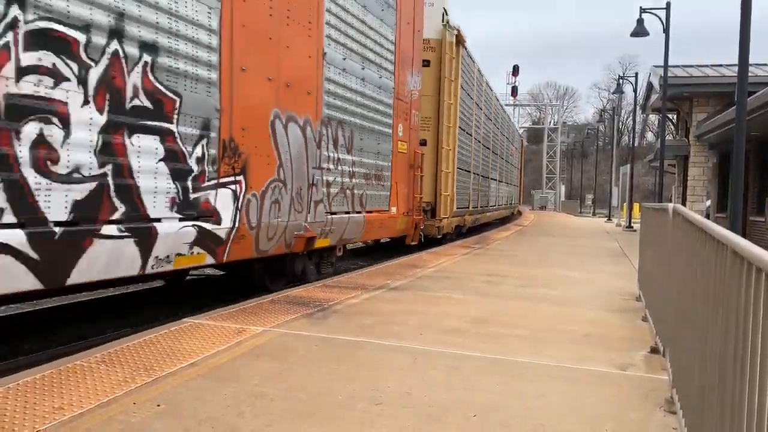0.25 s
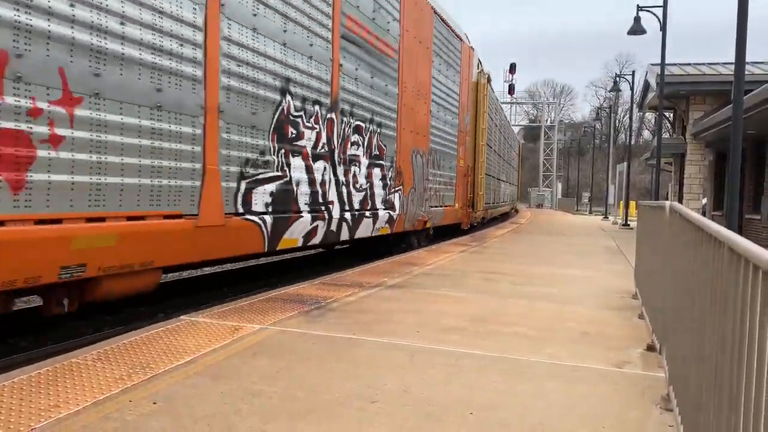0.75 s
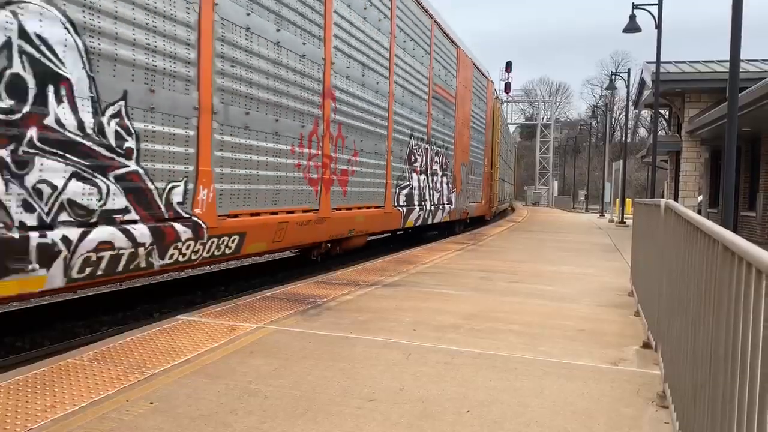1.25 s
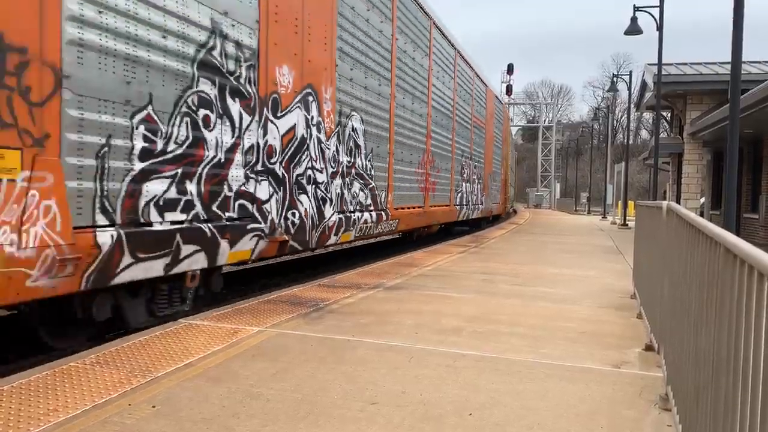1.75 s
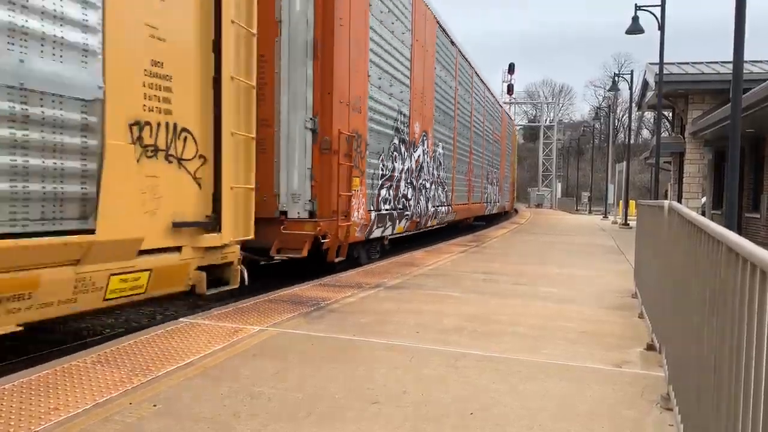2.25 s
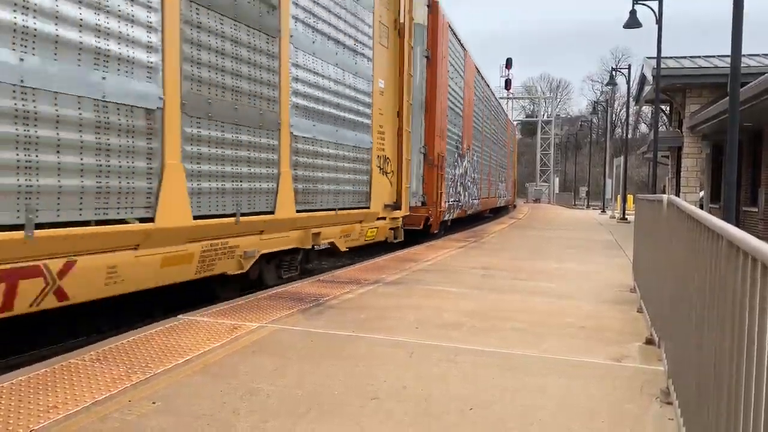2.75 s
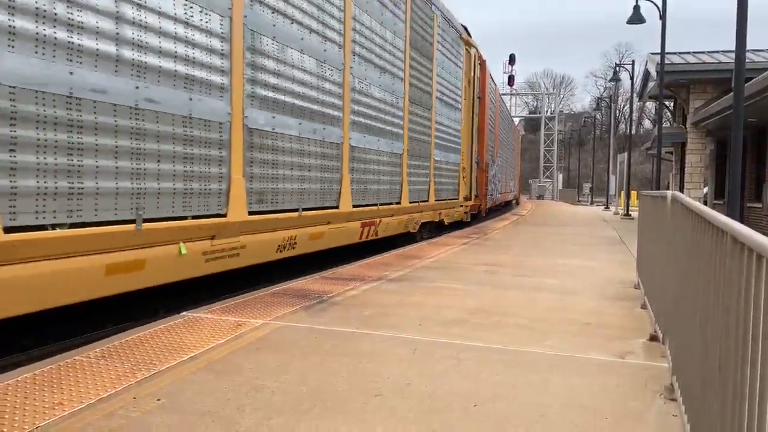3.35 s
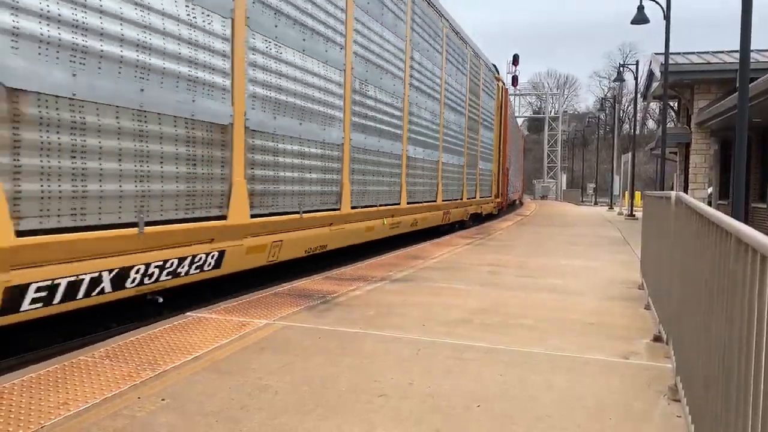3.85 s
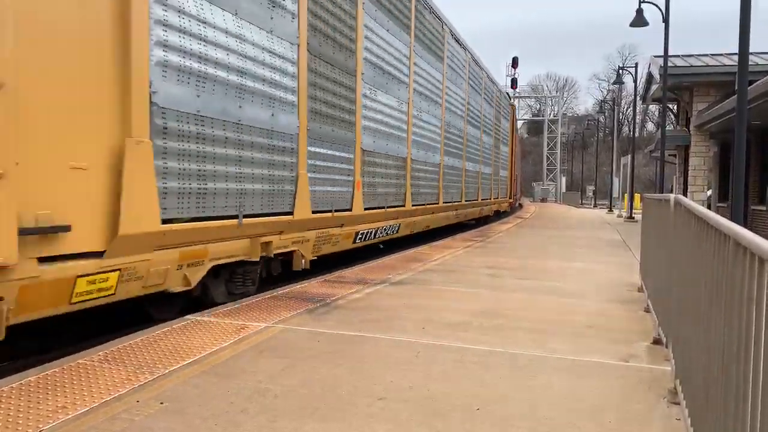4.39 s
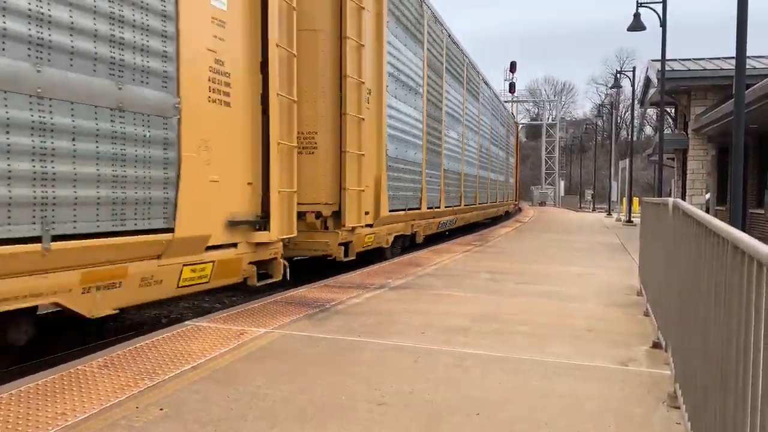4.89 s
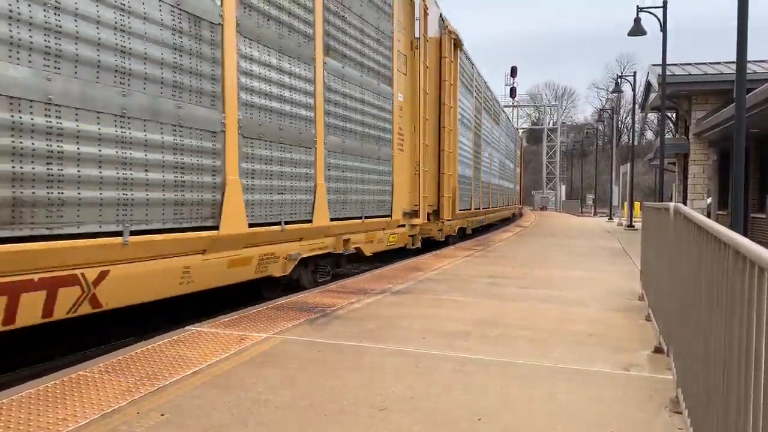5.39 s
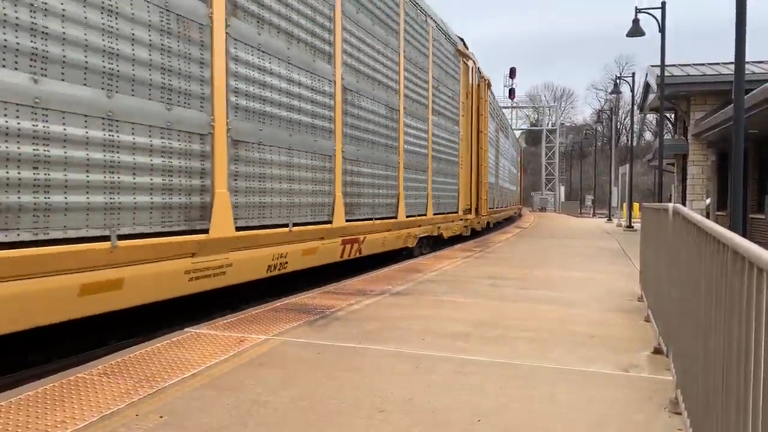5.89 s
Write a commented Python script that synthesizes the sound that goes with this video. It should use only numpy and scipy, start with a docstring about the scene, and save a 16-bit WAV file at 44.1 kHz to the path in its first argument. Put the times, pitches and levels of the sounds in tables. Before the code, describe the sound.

A few metres from stereo microphones on an open station platform, a long freight train rolls by without a break. Deep uneven rumble and hollow car-body noise carry a rougher steel roar. Every second or so wheels bang over a rail joint in quick clusters, booming and rattling. Flanges scrape and hiss, thin whistles come and go, panels drone, and near the end a wheel squeals hoarsely.

```python
"""Tall steel car carriers of a freight train roll past a station platform, a few metres from two microphones.
Rough wheels rumble through the hollow cars and roar on the rail, made from coloured noise and small impacts.
Wheels bang over a rail joint in clusters: bursts of noise die away as booms and rattles, and cars thump.
Flanges hiss as fluttering noise; wheels and panels sing as wandering tones, and a last wheel squeals."""
import sys
import numpy as np
from scipy import signal
from scipy.fft import rfft, irfft, next_fast_len
from scipy.io import wavfile
from scipy.ndimage import uniform_filter1d, map_coordinates

SR = 44100
rng = np.random.default_rng(int(sys.argv[2]) if len(sys.argv) > 2 else 0)


def log_audio(samples):
    """Write samples as a 16-bit WAV file to the path given in sys.argv[1]."""
    # one column per channel
    frames = np.atleast_2d(samples).T
    # limit to full scale, then quantise
    limited = np.clip(frames, -1, 1)
    pcm = np.round(limited * 32767).astype(np.int16)
    wavfile.write(sys.argv[1], SR, pcm)


N = 270333  # length in samples

# Tone colour of the boom in a hollow car. Each row: frequency in Hz, relative level in dB per Hz.
BOOM_SPECTRUM = [(20, -40), (45, -26), (70, -1.5), (110, 0), (160, 0), (250, -11.5), (400, -8.5),
                 (600, -18.5), (900, -28), (1500, -30), (4000, -58)]

STEEL_PATCHY_DB = 2.2  # how strongly resonances in the steel come and go


def amp(db):
    """Turn decibels into a gain."""
    return 10 ** (np.asarray(db) / 20)


def unit(x):
    """Scale to an rms (average strength) of 1."""
    return x / np.sqrt(np.mean(x ** 2) + 1e-20)


def along(points, hz):
    """Read a value between (Hz, value) points, on a logarithmic frequency axis."""
    point_hz, values = np.transpose(points)
    return np.interp(np.log(hz + 1), np.log(point_hz + 1), values)


def curves(rows):
    """Give one value per sample for each column after the time in seconds."""
    seconds, *columns = np.transpose(rows)
    return [np.interp(np.arange(N) / SR, seconds, column) for column in columns]


def wobble(rate, size=N):
    """Draw a smooth random curve through `rate` random points a second."""
    knots = rng.standard_normal(int(size * rate / SR) + 4)
    coarse = np.arange(0, size + 32, 32)  # a value every 32 samples is enough
    smooth = map_coordinates(knots, [coarse * rate / SR])
    return np.interp(np.arange(size), coarse, smooth)


def filtered(x, response):
    """Multiply the spectrum of x by a response that depends on frequency."""
    size = x.shape[-1]
    padded = next_fast_len(size + 8192)
    hz = np.fft.rfftfreq(padded, 1 / SR)
    return irfft(rfft(x, padded) * response(hz), padded)[..., :size]


def rush(spectrum, size=N):
    """Make two unrelated coloured noises, rms 1: the direct and the scattered sound."""
    noise = rng.standard_normal((2, size))
    return unit(filtered(noise, lambda hz: amp(along(spectrum, hz))))


def patchy(x, depth_db):
    """Let resonances come and go as different panels and wheels pass."""
    bins = signal.stft(x, nperseg=1024)[2]
    field = rng.standard_normal(bins.shape[1:])
    field = uniform_filter1d(field, size=4, axis=0)   # smooth over frequency
    field = uniform_filter1d(field, size=14, axis=1)  # smooth over time
    return unit(signal.istft(bins * amp(depth_db * unit(field)), nperseg=1024)[1][:, :N])


def rattle(spectrum, rate, size=N):
    """Loose steel chatters: about `rate` small uneven impacts a second at random times, rms 1."""
    strength_db = 5 * np.clip(rng.standard_normal(size), -2, 1.5)
    hits = (rng.random(size) < rate / SR) * amp(strength_db)
    t = np.arange(SR // 30) / SR
    tick = rng.standard_normal((2, len(t))) * amp(-60 * t / 0.079)  # falls 60 dB in 0.079 s
    ticks = signal.fftconvolve(hits[None], tick, axes=1)[:, :size]
    return unit(filtered(ticks, lambda hz: amp(along(spectrum, hz))))


def sing(centre_hz, width_hz, size=N, fall_hz=0, firm=0):
    """Friction drives a mode: its strength and phase wander about a firm core while its pitch sinks."""
    pitch_hz = centre_hz + fall_hz * np.linspace(.5, -.5, size)
    phase = 2 * np.pi * (rng.random() + np.cumsum(pitch_hz) / SR)
    core = (firm + wobble(2 * width_hz, size)) * np.cos(phase)
    wandering = wobble(2 * width_hz, size) * np.sin(phase)
    return unit(core + wandering)


def swell(length, hz, width_hz, fall_hz=0, slip_db=0):
    """A driven mode swells, holds and fades; narrow modes lock into a firm tone, slipping makes them flutter."""
    lock_hz, slip_rate = 22, 12  # modes narrower than this sing as firm tones; flutter points a second
    size = max(round(length * SR), SR // 20)
    flutter = amp(slip_db * wobble(slip_rate, size))
    tone = unit(sing(hz, width_hz, size, fall_hz, firm=lock_hz / width_hz) * flutter)
    return signal.windows.tukey(size, .35) * tone


def add(track, start, x):
    """Mix x into the track from a start time in seconds."""
    part = track[..., max(round(start * SR), 0):][..., :x.shape[-1]]
    part += x[..., :part.shape[-1]]


def rolling():
    """Wheel roughness shakes the hollow cars and the rail; loose panels chatter along."""
    # Tone colours of the three layers. Each row: frequency in Hz, relative level in dB per Hz.
    rumble_spectrum = [(15, -58), (25, -42), (40, -10.5), (55, -2.5), (75, -1), (100, -4.5), (140, -13),
                       (250, -10), (500, -99)]
    body_spectrum = [(60, -12), (120, 1), (200, -0.5), (300, 2), (400, -1), (520, -8), (700, -13.5),
                     (1000, -13), (1400, -29.5), (3000, -87)]
    roar_spectrum = [(400, -40), (600, 5), (850, -2), (1300, -1), (1850, -4), (2200, -5), (2600, -1),
                     (3200, -5.5), (4200, -9.5), (7000, -17), (12000, -60)]
    # How hard the passing wheels run. Each row: time in seconds, roughness in dB over the usual.
    roughness = [(0, -1), (0.8, -1.5), (1.15, 0.5), (1.6, -1), (2.3, 2.5), (2.75, -1.7), (3.4, -2),
                 (4.05, 2.5), (4.8, 0), (5.3, -2.5), (6.1, 0.4)]
    rumble_db, body_db, roar_db = -27, -24, -37.5  # levels at the usual roughness
    rumble_grows, roar_grows = 0.37, 1  # dB for each dB of roughness
    rumble_build_db, rumble_build_s = 3, 1.9  # the rumble starts this much lower; time constant of its rise
    lumps_db, body_patchy_db = 2.4, 1.7  # unevenness of the rumble; changing tone of the car bodies

    rough_db, = curves(roughness)
    build_db = -rumble_build_db * np.exp(-np.arange(N) / SR / rumble_build_s)
    rumble_level_db = rumble_db + rumble_grows * rough_db + build_db + lumps_db * wobble(16)
    rumble = amp(rumble_level_db) * rush(rumble_spectrum)

    body_noise = patchy(rush(body_spectrum), depth_db=body_patchy_db)
    body_mix = unit(body_noise + 0.15 * rattle(body_spectrum, rate=40))
    body = amp(body_db + rough_db + 0.83 * wobble(16)) * body_mix

    roar_noise = patchy(rush(roar_spectrum), depth_db=STEEL_PATCHY_DB)
    roar_mix = unit(roar_noise + 0.69 * rattle(roar_spectrum, rate=99))
    roar = amp(roar_db + roar_grows * rough_db + 0.057 * wobble(6.0)) * roar_mix
    return rumble + body + roar


def joints():
    """Wheels knock over the joint in quick clusters; between them the cars thump."""
    # Blows. Each row: start in seconds, boom level in dB, clang level in dB, hard steel crash level in dB,
    # all before the shift at the end.
    knocks = [(0.440, -25, -26.5, -36), (0.464, -19.5, -25.5, -30), (0.496, -14.5, -22, -32),
              (0.553, -23, -28, -32), (0.599, -22, -30, -43), (0.655, -26, -29, -41),
              (0.715, -37, -38, -48), (1.930, -15, -18, -24.5), (1.947, -13, -21, -18.5),
              (1.972, -15, -27, -24), (1.992, -16, -29, -32), (2.036, -11.5, -35, -37),
              (2.155, -19, -30, -53), (2.872, -15.5, -23, -27), (2.913, -15.5, -21.5, -28),
              (2.955, -24, -24.5, -47), (2.984, -29, -26.5, -27), (3.022, -22.5, -29, -33),
              (3.087, -17.5, -41, -48), (4.143, -17, -23.5, -13), (4.159, -14.5, -30, -16),
              (4.202, -25, -23.5, -24), (4.239, -24, -35, -34), (4.270, -17, -44, -40),
              (4.321, -30, -40, -44), (4.356, -23, -53, -48), (5.487, -17, -25, -44),
              (5.513, -13.5, -23.5, -41), (5.578, -13, -41, -42), (5.604, -19, -25, -39),
              (5.670, -20.5, -36, -44)]
    # Dull thumps of a car body. Each row: start in seconds, boom level in dB, pitch of its lowest mode in Hz,
    # level of that mode in dB, both levels before the shift at the end.
    thumps = [(0.949, -23, 81.4, -15.5), (1.739, -24, 74, -20.5), (3.397, -17.5, 77.4, -13),
              (3.721, -29, 81, -16), (3.915, -27, 72, -13.5), (4.485, -17, 67.4, -13)]
    out = np.zeros((2, N))
    for start, boom_db, clang_db, crash_db in knocks:
        add(out, start, blow(boom_db, clang_db, crash_db))
    for start, boom_db, hz, mode_db in thumps:
        add(out, start, thump(boom_db, hz, mode_db))
    return out * amp([[1], [-1.5]])  # the joint is near: more direct than scattered sound


def blow(boom_db, clang_db, crash_db):
    """One blow booms in the hollow car, rattles its steel and rings the wheel."""
    # Tone colours of the struck steel. Each row: frequency in Hz, relative level in dB per Hz.
    clang_spectrum = [(200, 2), (450, 2.5), (750, 7), (1000, 7), (1300, 2.5), (1900, -14), (2700, -1.5),
                      (3400, -10), (4500, -18), (7000, -16.5), (11000, -16.5), (16000, -42)]
    crash_spectrum = [(500, 5), (1000, -2), (1400, -2.5), (1850, 0), (2400, -2.5), (3000, -2), (3600, -6),
                      (4300, -6), (5200, -11), (7000, -17), (10000, -20), (16000, -42)]
    # Modes of a struck wheel. Each row: pitch in Hz, relative level in dB, time to fall 60 dB in seconds.
    wheel_modes = [(1846, 2.5, .3), (2035, -6, .3), (3553, -8, .23), (4330, -6, .22), (4802, -17, .5),
                   (5066, -14, .3), (5911, -20, .25), (6971, -18, .25)]
    knock_rise_s, boom_rise_s = 0.007, 0.011  # spreading through the steel and through the hollow car
    size = SR * 2 // 3
    t = np.arange(size) / SR
    boom = ring_out(rush(BOOM_SPECTRUM, size), boom_rise_s, life=0.71)
    clang_mix = unit(0.4 * rush(clang_spectrum, size) + rattle(clang_spectrum, rate=170, size=size))
    clang = ring_out(clang_mix, knock_rise_s, life=0.92)
    crash_mix = unit(0.9 * rush(crash_spectrum, size) + rattle(crash_spectrum, rate=210, size=size))
    crash = ring_out(crash_mix, knock_rise_s, life=0.5)
    ring = np.zeros(size)
    for hz, db, t60 in wheel_modes:
        uneven_db = rng.standard_normal()  # no two blows excite a mode alike
        ring += amp(db + uneven_db - 60 * t / t60) * sing(hz, width_hz=36, size=size)
    crash[0] += amp(-11.5) * ring * (1 - np.exp(-t / .008))  # the wheel is heard in the direct sound
    return amp(boom_db) * boom + amp(clang_db) * clang + amp(crash_db) * crash


def thump(boom_db, hz, mode_db):
    """A car body drops on its springs: a short boom over a few swings of its lowest mode."""
    rise_s, mode_t60_s = 0.014, 0.18  # onset time; time for the lowest mode to fall 60 dB
    t = np.arange(SR) / SR
    out = amp(boom_db) * ring_out(rush(BOOM_SPECTRUM, SR), rise_s, life=0.5)
    envelope = amp(mode_db - 60 * t / mode_t60_s) * (1 - np.exp(-t / rise_s))
    out[0] += envelope * np.sqrt(2) * np.sin(2 * np.pi * hz * t)
    return out


def ring_out(x, rise, life):
    """The blow spreads through the car, then each frequency dies at its own speed."""
    # How long a car rings. Each row: frequency in Hz, time to fall 60 dB in seconds, for a life of 1.
    car_ring = [(60, 0.54), (300, 0.57), (900, 0.89), (2500, 0.64), (6000, 0.56), (14000, 0.16)]
    hz, t, bins = signal.stft(x, SR, nperseg=256)
    t60 = life * along(car_ring, hz)[:, None]
    tail = signal.istft(bins * amp(-60 * t / t60), SR, nperseg=256)[1][:, :x.shape[1]]
    onset = 1 - np.exp(-2 * np.arange(x.shape[1]) / SR / max(rise, .001))  # time constant: half the rise
    return tail * onset


def flanges():
    """Steel slides on steel: a coarse scrape under a bright hiss that flutters with the contact."""
    # Tone colours from coarse to fine. Each row: frequency in Hz, relative level in dB per Hz.
    scrape_spectrum = [(2200, 4), (3500, 6.5), (4500, 8), (5600, 8), (6500, 7), (7500, 7.5), (8600, 4),
                       (11000, -5), (16000, -18)]
    hiss_spectrum = [(6500, -40), (8300, -9), (9000, -6), (10000, -1.5), (11400, 2), (12500, 0.5),
                     (14000, -5), (15800, -8), (17000, -60)]
    sizzle_spectrum = [(10500, -35), (12600, -6), (13700, 1), (14500, -0.5), (15700, 0), (17000, -50)]
    scrape_gain, hiss_gain, sizzle_gain = sliding()
    scrape = scrape_gain * amp(-2.5) * patchy(rush(scrape_spectrum), depth_db=STEEL_PATCHY_DB)
    hiss = hiss_gain * amp(-0.5 + contact_flutter_db()) * patchy(rush(hiss_spectrum), depth_db=STEEL_PATCHY_DB)
    sizzle = sizzle_gain * amp(4.5 + contact_flutter_db()) * patchy(rush(sizzle_spectrum), depth_db=3.0)
    return scrape + hiss + sizzle


def contact_flutter_db():
    """The sliding contact flutters in dB, quickly and more slowly at once."""
    return .75 * wobble(35) + .8 * wobble(14)


def sliding():
    """Each rub bites, holds and lets go, its power adding to light sliding that never stops."""
    # A flange leans on the rail. Each row: start in seconds, length in seconds, then scrape, hiss and
    # fine sizzle strength in dB, before flanges() shifts and flutters them.
    rubs = [(-0.1, 0.62, -42.5, -37.5, -49), (0.482, 0.27, -38, -35, -42), (0.74, 0.43, -37, -35.5, -55),
            (0.91, 0.13, -54, -29.5, -39), (1.673, 0.31, -42, -44, -46), (2.32, 0.14, -36.5, -53, -52),
            (2.745, 0.31, -38.5, -59, -46), (3.247, 0.044, -35.5, -56, -58), (3.405, 0.12, -34.5, -32, -41),
            (3.57, 0.47, -44, -48, -38.5), (4.072, 0.35, -40.5, -35.5, -39), (4.42, .1, -64, -57, -34),
            (4.872, 0.61, -40.5, -40, -35.5), (5.378, 0.18, -27, -29.5, -39), (5.55, 0.21, -30.5, -33, -34),
            (5.784, 0.23, -35.5, -39, -51)]
    attack_s, release_s = 0.066, 0.071  # time to bite, time constant of letting go
    steady_db = [[-51], [-40], [-40.5]]  # scrape, hiss and sizzle of the light sliding
    t = np.arange(N) / SR
    power = amp(steady_db) ** 2
    for start, length, *levels_db in rubs:
        bite = np.clip((t - start) / attack_s, 0, 1)
        release = np.exp(-np.maximum(t - start - length, 0) / release_s)
        power = power + np.outer(amp(levels_db), bite * release) ** 2
    return np.sqrt(power)


def squeal():
    """One wheel binds in the curve: a hoarse screech, joined by bursts on the wheel's modes."""
    # The screech around the squeal: start in seconds, length in seconds, pitch in Hz, width in Hz, level in dB.
    screech = (5.36, .8, 8030, 300, -36.5)
    # Bursts of the squeal. Each row: start in seconds, length in seconds, level in dB.
    bursts = [(5.57, .17, -38), (5.73, .27, -35.3), (5.96, .16, -37)]
    # Modes of the squealing wheel. Each row: pitch in Hz, width in Hz, level in dB relative to the burst.
    modes = [(3580, 20, -8.5), (4598, 13, -4), (4660, 170, -4), (4714, 13, -3), (7870, 8, -8),
             (8065, 15, -6), (11601, 14, -12), (12678, 12, -2), (13944, 5, -1)]
    out = np.zeros((2, N))
    start, length, hz, width_hz, db = screech
    add(out[0], start, amp(db) * swell(length, hz, width_hz))
    for start, length, db in bursts:
        for hz, width_hz, mode_db in modes:
            add(out[0], start, amp(db + mode_db) * swell(length, hz, width_hz, slip_db=1.6))
    return out


def wheels():
    """Wheel modes ring faintly all along, and friction makes them grind or whistle at times."""
    # Modes that rolling keeps alive. Each row: pitch in Hz, level in dB before a common 3 dB cut.
    hum = [(1612, -59), (1786, -54), (1933, -57), (4245, -60), (12850, -54), (14074, -53), (14175, -51)]
    # A wheel grinds. Each row: start in seconds, length in seconds, pitch ratio, level in dB,
    # brightness in dB per octave.
    grinds = [(0.77, .16, 1.008, -43.5, 0), (0.87, .19, 1.0, -40, -1.5), (1.03, .19, .996, -40.5, 1)]
    # Modes of a grinding wheel. Each row: pitch in Hz before the pitch ratio, width in Hz, relative level in dB.
    grind_modes = [(2320, 15, -7), (2490, 30, -11), (2645, 16, -3), (2725, 16, -4), (3060, 15, -12),
                   (3430, 25, -13), (3880, 65, -4.5), (4490, 50, -10), (5070, 70, -5), (6380, 65, -4),
                   (7000, 25, -13)]
    # A single mode sings out. Each row: start in seconds, length in seconds, pitch in Hz,
    # fall of pitch in Hz, width in Hz, level in dB.
    whistles = [(0, 3.45, 15531, 0, 5, -46), (.3, .4, 15529, 0, 5, -35), (.12, .65, 12990, 0, 12, -47),
                (.93, .17, 11400, 100, 300, -38), (1.55, 1.35, 15531, 0, 5, -41),
                (2.12, .41, 6390, 60, 65, -48), (2.36, .17, 5240, 20, 20, -49),
                (3.25, .1, 2690, 260, 80, -39), (3.49, .18, 2570, 120, 130, -43),
                (3.55, .4, 3800, 120, 110, -49), (3.5, 2.8, 13942, 0, 5, -43),
                (3.88, .17, 11700, 100, 130, -43), (3.96, .15, 2790, 80, 45, -44.5),
                (4.35, .75, 13950, 400, 300, -40), (4.47, .16, 4850, 40, 20, -48),
                (4.4, .85, 5720, 60, 220, -50)]
    grind_sag, grind_pivot_hz = 0.018, 3770  # share by which the pitch sinks; centre of the brightness tilt
    out = np.zeros(N)
    for hz, db in hum:
        out += amp(-3) * amp(db + 2 * wobble(2)) * sing(hz, width_hz=12)
    for start, length, ratio, db, bright_db in grinds:
        for hz, width_hz, mode_db in grind_modes:
            gain = amp(db + mode_db + bright_db * np.log2(hz / grind_pivot_hz))
            add(out, start, gain * swell(length, ratio * hz, width_hz, grind_sag * hz))
    for start, length, hz, fall_hz, width_hz, db in whistles:
        add(out, start, amp(db) * swell(length, hz, width_hz, fall_hz))
    return np.array([out, np.zeros(N)])  # direct sound only


def panels():
    """Side panels drone and sink in pitch as they go by."""
    # Each row: start in seconds, length in seconds, pitch in Hz, fall of pitch in Hz, width in Hz, level in dB.
    drones = [(1.17, .68, 290, 18, 22, -33), (2.48, .3, 272, 6, 22, -35), (3.6, .55, 425, 10, 50, -33.5),
              (3.77, .35, 290, 4, 22, -31.5), (4.62, .9, 284, 4, 20, -31.5)]
    out = np.zeros((2, N))
    for start, length, hz, fall_hz, width_hz, db in drones:
        add(out[0], start, amp(db) * swell(length, hz, width_hz, fall_hz, slip_db=3))
    return out


def fitting():
    """The hardest blow shakes a steel fitting, which rings on and sinks in pitch as it moves away."""
    # Each row: pitch in Hz, level in dB at the start of the decay, time to fall 60 dB in seconds.
    modes = [(2556, -22.5, .62), (2696, -26.5, .48)]
    start, rise_s, width_hz, fall_hz = 4.185, .05, 25, 70  # times in seconds
    out = np.zeros((2, N))
    t = np.arange(SR * 2 // 3) / SR
    for hz, db, t60 in modes:
        fade = amp(db - 60 * t / t60) * (1 - np.exp(-t / rise_s))
        add(out[0], start, fade * sing(hz, width_hz, len(t), fall_hz, firm=4))
    return out


def microphones(field, bearing=1):
    """Direct sound reaches the two ports out of step; scattered sound differs between them."""
    # Likeness of the two ports. Each row: frequency in Hz, likeness from 0 to 1.
    alike = [(60, .88), (300, .76), (900, .6), (1500, .72), (2700, .65), (4000, .45), (6500, .28),
             (8000, .8), (10000, .88), (15000, .92)]
    # Balance of the ports. Each row: frequency in Hz, left minus right in dB.
    tilt = [(50, 0), (125, 0), (300, 2), (650, 4.5), (1200, 1), (4000, -1), (6500, -1.5), (8500, -0.5)]
    # Timing of the ports. Each row: frequency in Hz, radians by which left leads at a bearing of 1.
    lead = [(0, 0), (1150, 3.1), (3150, 9.4), (6300, 19.2), (7900, 15.8), (8800, 15.6), (10900, 12.6),
            (13400, 9.4), (15700, 6.2)]
    half = np.array([[.5], [-.5]])  # each port takes half of the difference

    def shares(hz):
        turn = np.arccos(np.clip(along(alike, hz), 0, .99)) / 2
        return np.array([np.cos(turn), np.sin(turn)])

    def ports(hz):
        lead_radians = bearing * np.interp(hz, *np.transpose(lead))
        return amp(half * along(tilt, hz)) * np.exp(1j * half * lead_radians)

    direct, scattered = filtered(field, shares)
    return filtered(np.array([direct + scattered, direct - scattered]), ports)


def scene():
    """Hear the whole train from the platform."""
    near = rolling() + joints() + flanges() + wheels() + panels() + fitting()
    # The squealing wheel is further down the track: 0.96 of the usual lead between the ports.
    return microphones(near) + microphones(squeal(), bearing=0.96)


def record(dry):
    """Round off the highest peaks, cut the deepest bass and keep nothing above the band limit."""
    low_cut_hz, top_hz = 29, 15760
    rounded = dry / (1 + np.abs(dry) ** 6) ** (1 / 6)

    def band(hz):
        low_cut = hz ** 4 / np.hypot(hz ** 4, low_cut_hz ** 4)
        return (hz < top_hz) * low_cut

    return filtered(rounded, band)


dry = scene()
out = record(dry)
log_audio(out)
```